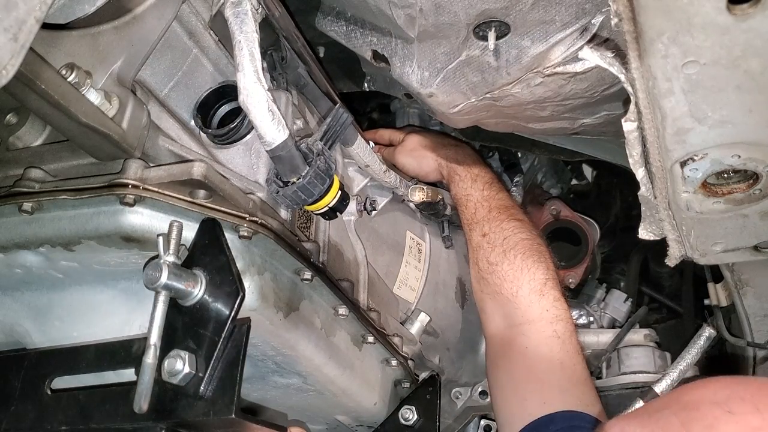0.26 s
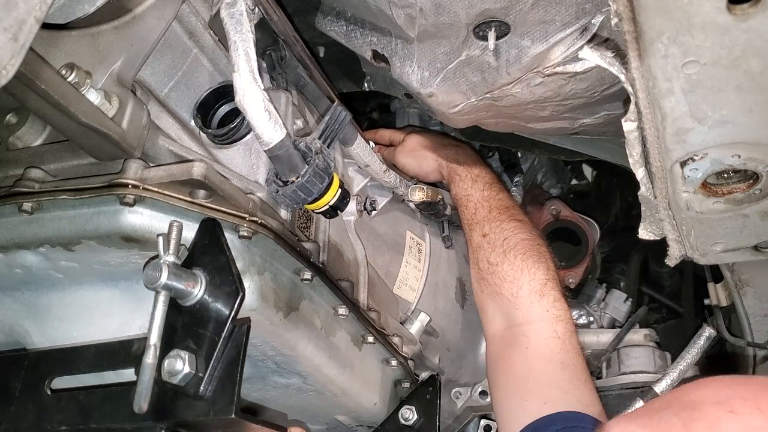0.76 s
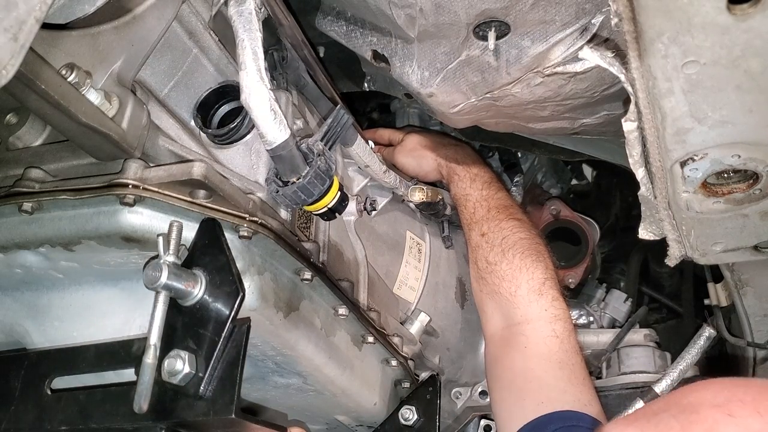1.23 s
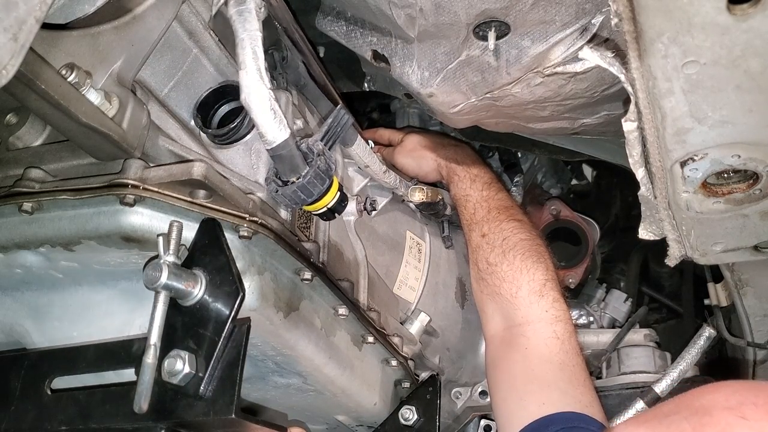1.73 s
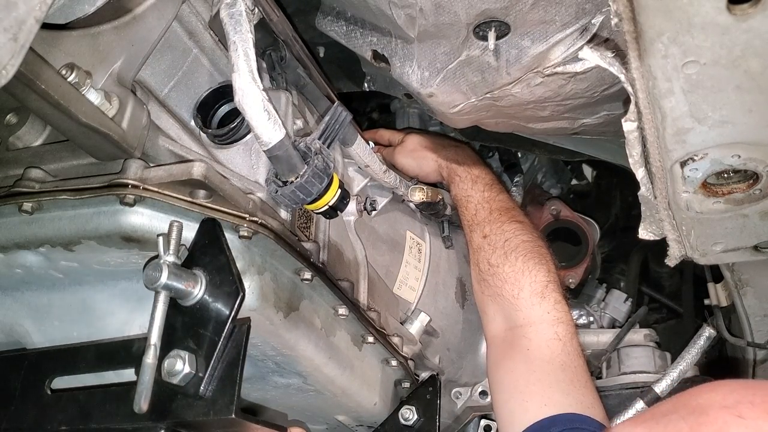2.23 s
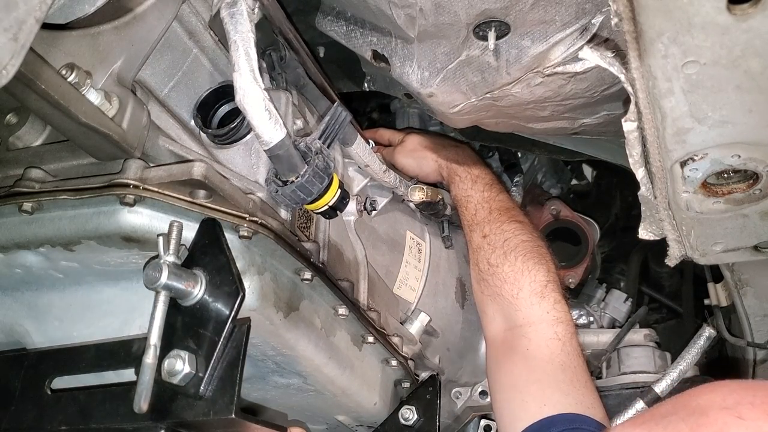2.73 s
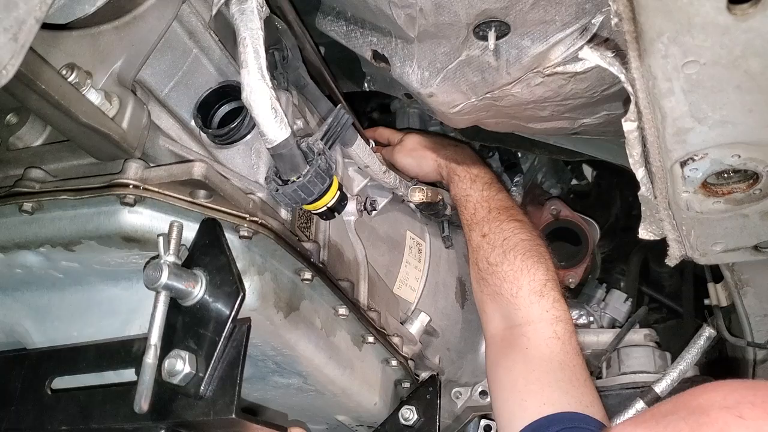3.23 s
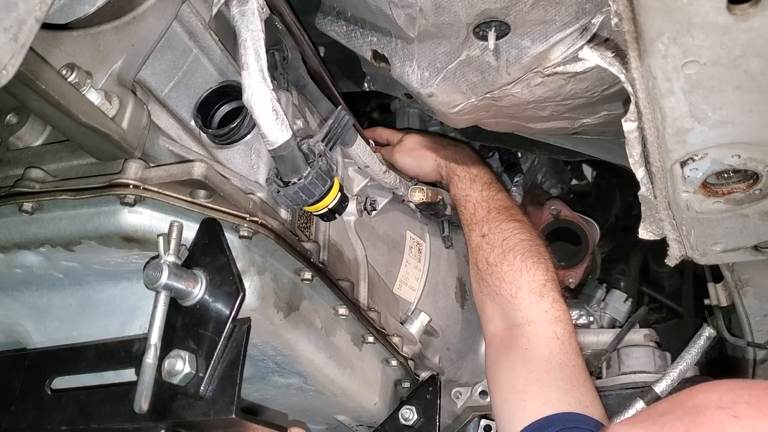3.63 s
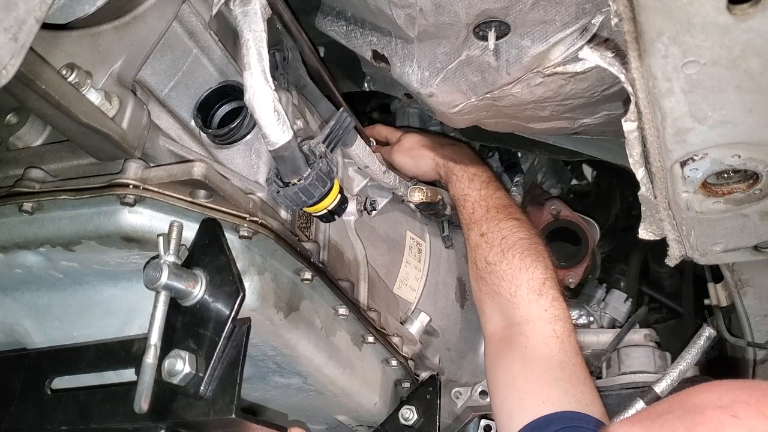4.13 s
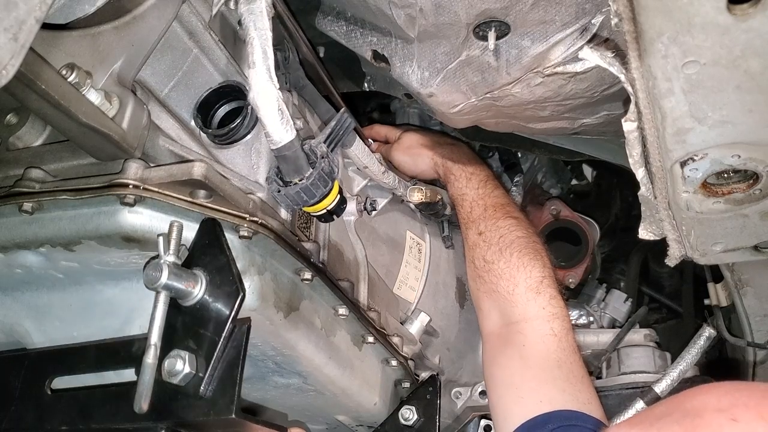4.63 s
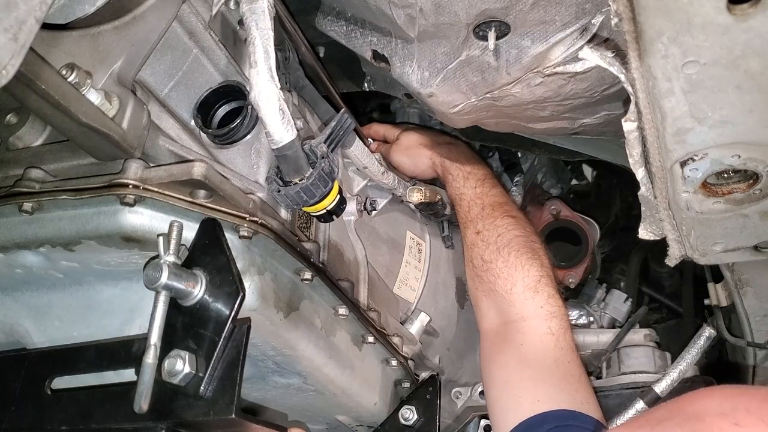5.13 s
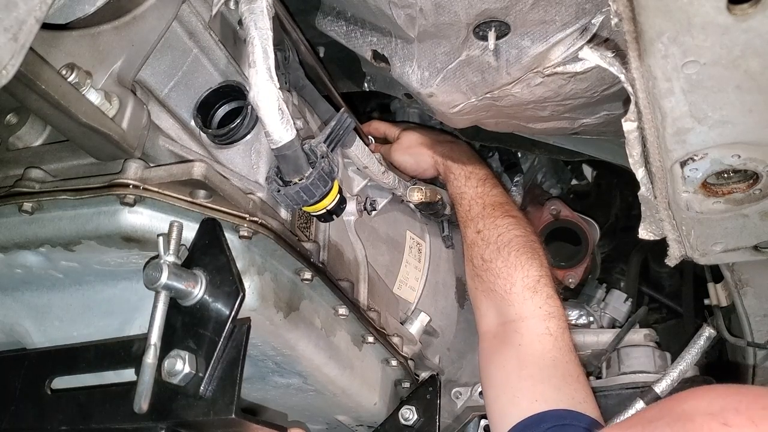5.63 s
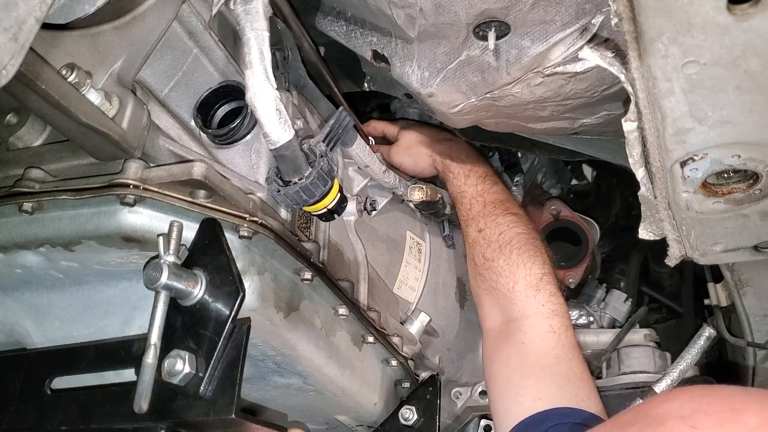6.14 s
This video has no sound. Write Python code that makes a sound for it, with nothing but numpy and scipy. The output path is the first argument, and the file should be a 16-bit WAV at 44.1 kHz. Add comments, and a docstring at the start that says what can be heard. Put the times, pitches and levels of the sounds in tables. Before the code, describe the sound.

A cordless ratchet works on gearbox bolts beneath a car, near the microphone on the left. After one clack over the workshop hum, it rattles through a short, laboured burst and winds down. The tool clicks and knocks as it is reseated, then spins freely to the end with rapid, even chatter, a growing whine and occasional high socket pings, all reflecting tightly off the underbody.

```python
"""A cordless power ratchet backs bolts out of a gearbox under a car on a lift, close up and to the left.
A lone clack sounds over the workshop hum, then a short loaded run labours and coasts to a stop.
Every stroke of the yoke drags the pawl over the teeth, and the underbody throws the clatter back.
The tool clicks and bumps as it is reseated. A long free run follows and lasts to the end,
its gear whine slowly building while the loose socket chimes now and then."""
import sys
import numpy as np
from scipy import signal
from scipy.fft import rfft, irfft, next_fast_len
from scipy.io import wavfile
from scipy.ndimage import uniform_filter1d

SR = 44100
rng = np.random.default_rng(int(sys.argv[2]) if len(sys.argv) > 2 else 0)


def master(y):
    """Save y as 16-bit WAV."""
    cut = np.clip(np.atleast_2d(y).T, -1, 1)
    pcm = np.round(cut * 32767)  # scale
    wavfile.write(sys.argv[1], SR, pcm.astype(np.int16))


N = 280917
TIME = np.arange(N) / SR
RIGHT_LAG = 21  # samples by which the tool reaches the right channel late

# Pulls of the trigger. Each row: press and release in seconds.
TRIGGER_PULLS = [(.91, 1.6), (2.685, 7)]


def undb(db):
    """Decibels to gain."""
    return 10 ** (np.asarray(db) / 20)


def curves(table):
    """One automation curve for each value column of a timed table."""
    seconds, *columns = np.transpose(table)
    return [np.interp(TIME, seconds, column) for column in columns]


def colour(x, hz, db):
    """EQ through a few breakpoints on a log frequency axis."""
    size = next_fast_len(N + 4096)
    bin_hz = np.maximum(np.arange(size // 2 + 1) * SR / size, 1)
    response = undb(np.interp(np.log(bin_hz), np.log(hz), db))
    return irfft(rfft(x, size) * response, size)[..., :N]


def walk(rate_hz):
    """Smooth random wander with a spread near 1."""
    step = int(SR / rate_hz)
    points = rng.standard_normal(N // step + 2)
    return uniform_filter1d(np.interp(np.arange(N) / step, np.arange(len(points)), points), step // 2)


def fade(t, t60):
    """Exponential decay, 60 dB down after t60 seconds."""
    return np.exp(-np.log(1000) * t / t60)


def place(x, right_db):
    """Set a sound on the left: the right channel gets it later and softer."""
    return np.array([x, undb(right_db) * np.roll(x, RIGHT_LAG)])


def rings(rows, rise_s):
    """Rough resonances: bands of noise that build over a short contact and die away."""
    out, t = np.zeros(N + SR), np.arange(SR // 2) / SR
    for start_s, hz, width_hz, db, t60 in rows:
        start = int(start_s * SR)
        band = signal.butter(2, [hz - width_hz / 2, hz + width_hz / 2], "band", fs=SR, output="sos")
        ring = signal.sosfilt(band, rng.standard_normal(SR))[-len(t):]
        ring /= np.sqrt(np.mean(ring ** 2))
        out[start:start + len(t)] += undb(db) * fade(t, t60) * (1 - np.exp(-t / rise_s)) * ring
    return out[:N]


def workshop(air_bed_db=-49):
    """Room tone of machine hum and moving air, centred in the bass and wide above."""
    # Each row: frequency in Hz, relative level of the air in dB.
    air_spectrum = [(20, -34), (38, -20), (55, -8.5), (87, -6), (166, -14.5), (270, -13.5), (350, -21.5),
                    (550, -23.5), (700, -28), (1000, -27.5), (2200, -32), (6600, -40.5), (7600, -49),
                    (16000, -50)]
    # Each row: pitch in Hz, level in dB before the fader.
    hum_tones = [(58, -61), (86, -51), (118.4, -62), (280, -69), (388, -70.5), (571, -72), (818, -76.5)]
    # Each row: time in seconds, hum fader in dB, air fader in dB.
    faders = [(0, 4, -1.5), (.7, 4.5, 1.5), (.92, 8, 5), (1.05, -3, -8), (2.55, -10, -14.5),
              (3, -9.5, -8.5), (6.37, -9, -14)]
    hum_db, air_db = curves(faders)
    hz, db = np.transpose(air_spectrum)
    side_db = np.interp(np.log(hz), np.log([80, 250, 600]), [-17, -5, 0])
    mid = colour(rng.standard_normal(N), hz, db)
    side = colour(rng.standard_normal(N), hz, db + side_db)
    air = np.array([mid + side, mid - side]) / np.std(mid) * undb(air_bed_db + air_db + .95 * walk(13))
    hum = sum(undb(db + 2 * walk(9)) * np.sin(2 * np.pi * hz * TIME + (.3 + hz / 350) * walk(14))
              for hz, db in hum_tones)
    return air + np.sqrt(2) * undb(hum_db) * hum


def windings(hz=8160, lead_s=.008):
    """The motor's windings sing thinly just before it turns."""
    chirps = [(pressed - lead_s, hz, 200, -42.5, .12) for pressed, _ in TRIGGER_PULLS]
    return place(rings(chirps, rise_s=.01), right_db=-8.5)


def bumps():
    """The tool bumps and scuffs the gearbox housing."""
    # Each row: start in seconds, centre in Hz, width in Hz, level in dB, t60 in seconds.
    contacts = [(.859, 4460, 2000, -23, 0.012), (.867, 3670, 1200, -31, 0.026),
                (.966, 863, 252, -30.5, 0.19), (2.275, 225, 90, -48, 0.24),
                (2.308, 3550, 3000, -51.5, 0.045), (2.372, 207, 91, -46, 0.27),
                (2.374, 696, 690, -51, 0.15), (2.401, 1150, 300, -38, 0.062),
                (2.402, 2230, 2110, -43.5, 0.043), (2.765, 172, 70, -44, 0.21),
                (2.84, 161, 68.6, -39, 0.36), (2.85, 910, 400, -32.5, .25)]
    return place(rings(contacts, rise_s=.0014), right_db=-7.5)


def socket_chimes(width_hz=350, t60=.05):
    """The loose socket rings in short, bright pings."""
    # Each row: start in seconds, pitch in Hz, level in dB.
    pings = [(1.0, 9530, -7.5), (1.005, 8410, -13), (1.147, 9650, -10), (1.751, 9760, -17),
             (3.023, 9900, -14), (4.008, 9600, -9), (4.553, 9830, -12), (5.158, 9770, -7.5),
             (5.855, 9700, -10)]
    chimes = rings([(start_s, hz, width_hz, db, t60) for start_s, hz, db in pings], rise_s=.00033)
    return place(chimes, right_db=-8.5)


def motor(spin_up_s=.045, coast_s=.36, friction=.15):
    """Spin 0-1 and seconds since the trigger pull: the motor runs up fast and coasts against friction."""
    spin, age = np.zeros(N), np.zeros(N)
    for pressed, released in TRIGGER_PULLS:
        rise = 1 - np.exp(-np.maximum(TIME - pressed, 0) / spin_up_s)
        coast = (1 + friction) * np.exp(-np.maximum(TIME - released, 0) / coast_s) - friction
        spin += rise * np.maximum(coast, 0)
        age = np.where(TIME >= pressed, TIME - pressed, age)
    return spin, age


def effort(spin, load, slack_s=.0087, waver_db=1):
    """Gains of the clatter's ring and low body: both follow the spin once the slack is taken up."""
    # Each row: time in seconds, level of the ring at full spin in dB.
    fader = [(1.05, -16.5), (1.38, -19), (1.5, -17.5), (1.75, -20.5), (2.7, -24.5), (2.85, -17.5),
             (3.08, -20.5), (4.3, -20), (5.4, -20.5), (6.25, -19)]
    engaged = np.interp(TIME - slack_s, TIME, spin)
    level = undb(curves(fader)[0] + waver_db * walk(13))
    body_db = -24.5 + 3 * load
    return level * engaged ** 1.52, level * engaged ** .91 * undb(body_db)


def drive(turns, age, load, gain, gear_teeth=42, build_s=2.7):
    """The yoke shakes, harder under load, and the gears' wavering whine comes in as a run goes on."""
    # Each row: multiple of the stroke rate, free and loaded level in dB relative to the clatter.
    harmonics = [(1, -51.5, -45), (2, -54.5, -35.5), (3, -43, -34.5), (4, -45, -38.5), (5, -50, -43)]
    shake = np.zeros(N)
    for multiple, free_db, loaded_db in harmonics:
        level = undb(free_db + load * (loaded_db - free_db) + 3.9 * walk(11))
        shake += level * np.sin(2 * np.pi * multiple * turns + .37 * walk(15))
    whine_db = np.interp(age, [0, build_s], [-36, -18.5]) + 3.3 * walk(30)
    whine = undb(whine_db) * np.sin(2 * np.pi * gear_teeth * turns + 1.8 * walk(110) + 3 * walk(8))
    return np.sqrt(2) * gain * (place(shake, right_db=-8) + place(whine, right_db=-5))


def panels(x, sway_s=.00005):
    """Early reflections off nearby panels comb the sound; the comb shifts as the hand sways."""
    # Each row: delay in seconds, level in dB.
    taps = [(.0019, -27.5), (.0043, -21), (.0071, -23.5)]
    mirrored = [sum(undb(db) * np.interp(TIME - delay - sway_s * walk(3), TIME, channel)
                    for delay, db in taps) for channel in x]
    return x + np.array(mirrored)


def grip(x, depth_db=1.8, rate_hz=6):
    """Bands half an octave apart swell and fade on their own as the hand shifts."""
    out = x
    for hz in 1900 * np.sqrt(2) ** np.arange(6):
        band = signal.lfilter(*signal.iirpeak(hz, Q=7, fs=SR), x)
        out = out + band * (undb(depth_db * walk(rate_hz)) - 1)
    return out


def head(x, load):
    """The steel head colours the blows; under load the housing rings along through the tight bolt."""
    # The head's EQ, free and loaded. Each row: frequency in Hz, left gain in dB, right gain in dB.
    free_eq = [(170, -46, -38), (355, -38, -43.5), (523, -25, -32.5), (1566, -21.5, -24),
               (1830, -11.5, -18), (3030, -3, -7.5), (3890, -7, -13), (6580, -2.5, -14.5),
               (8060, -10, -12.5), (8900, -2.5, -3.5), (10000, -4.5, -10.5), (13640, 4, -10.5),
               (13900, 9, -7), (14060, -2.5, -12)]
    loaded_eq = [(152.4, -39.5, -36.5), (354, -32, -48.5), (514, -26, -32), (1566, -21.5, -26),
                 (2140, -10.5, -17), (2740, -2.5, -13.5), (4700, -2, -13), (5730, -8, -19), (6660, -4, -20),
                 (7650, -12, -23), (8800, -9, -13.5), (10200, -10, -20), (13100, 2, -15), (15700, 1, -15)]
    # Each row: centre in Hz, width in Hz, gain in dB.
    housing_modes = [(550, 38, 1.5), (2750, 510, -2), (4250, 650, -13.5)]
    free, loaded = (np.array([colour(x[0], hz, left_db), colour(x[1], hz, right_db)])
                    for hz, left_db, right_db in (np.transpose(free_eq), np.transpose(loaded_eq)))
    housing = sum(undb(db) * signal.lfilter(*signal.iirpeak(hz, hz / width, fs=SR), loaded)
                  for hz, width, db in housing_modes)
    return (1 - load) * free + load * (loaded + housing)


def strike(times, sizes, ring_s, rise_s, echo_db, echo_s):
    """Each blow cracks, rings the steel in its own mix and scatters off the underbody."""
    # Modes of head and socket. Each row: pitch in Hz, t60 in seconds, gain in dB.
    steel_modes = [(1942, 0.059, -25), (2250, 0.025, -38.5), (2810, 0.02, -29), (3970, 0.01, -36),
                   (6100, .012, -15), (8470, 0.023, -33.5), (9640, 0.022, -12.5), (13470, 0.016, -19.5)]
    starts = (times * SR).astype(int)
    t = np.arange(SR // 3) / SR
    crack_t = t[:SR // 60]
    crack = fade(crack_t, ring_s) * (1 - np.exp(-crack_t / rise_s))
    echo = fade(t, echo_s) * (1 - np.exp(-t / .001))
    # overlapping cracks and their diffuse echoes add in energy
    power = signal.oaconvolve(np.bincount(starts, sizes ** 2, N)[:N], crack ** 2)[:N]
    power += undb(2 * echo_db) * signal.oaconvolve(power, echo ** 2 / np.sum(echo ** 2))[:N]
    near, far = np.sqrt(np.abs(power)) * rng.standard_normal((2, N))
    for hz, t60, db in steel_modes:
        blows = np.bincount(starts, sizes * rng.standard_normal(len(starts)), N)[:N]
        radius, angle = fade(1 / SR, t60), 2 * np.pi * hz / SR
        feedback = [1, -2 * radius * np.cos(angle), radius ** 2]
        near = near + undb(db) * signal.lfilter([0, radius * np.sin(angle)], feedback, blows)
    # long waves reach both sides alike, short ones by different paths
    blend_hz = [700, 1500, 8000]
    right = colour(near, blend_hz, [-.8, -7, -11]) + colour(far, blend_hz, [-8, -1, -.4])
    return np.array([near, np.roll(right, RIGHT_LAG)])


def clacks(load):
    """Single hard blows as the pawl catches or the socket shifts on the bolt."""
    # Each row: start in seconds, strength of the blow in dB.
    hits = [(0.4959, -15.5), (0.8595, -38), (0.932, -1), (0.9497, -4), (0.965, -4), (1.006, -4),
            (1.101, -7), (1.1374, -5), (1.1782, -5), (1.455, -4), (1.568, -2.5), (1.59, -5), (1.7412, -5.5),
            (1.751, -7), (1.7928, -17), (1.8702, -9), (2.0539, -11), (2.094, -26), (2.098, -15.5),
            (2.171, -13), (2.2049, -13.5), (2.2468, -36), (2.4003, -48), (2.6408, -41), (2.728, -8.5),
            (4.8189, -4), (5.0704, -4.5)]
    times, db = np.transpose(hits)
    blows = strike(times, undb(db), ring_s=.019, rise_s=.00018, echo_db=-17.5, echo_s=.21)
    return colour(head(blows, np.clip(load, 0, .3)), [500, 1200, 2500, 14000], [-.5, 8.5, -2, -.5])


def pawl(turns, stroke_hz, load, slop=.016, scatter_db=2.1):
    """Times and sizes of the pawl's blows: one pattern every stroke, a little loose in time and force."""
    # Each row: place in the stroke from 0 to 1, free strength in dB, loaded strength in dB.
    pattern = [(.1, 1.5, -4), (.29, 3, -5), (.37, -2.5, -5.5), (.52, 1.5, -8.5), (.6, 3.5, -6),
               (0.902, -9.5, -4.5)]
    where, free_db, loaded_db = np.transpose(pattern)
    strokes = np.arange(int(turns[-1]))[:, None]
    chance = np.clip(rng.standard_normal((len(strokes), 2, len(where))), -2, 1.4)
    times = np.interp(strokes + where + slop * chance[:, 0], turns, TIME)
    db = free_db + np.interp(times, TIME, load) * (loaded_db - free_db) + scatter_db * chance[:, 1]
    # below 36 strokes a second the pawl drops more softly
    return times, undb(db) * np.minimum(np.interp(times, TIME, stroke_hz) / 36, 1)


def clatter(turns, stroke_hz, load, ring_gain, body_gain, rattle_db=-14, rasp_db=-20):
    """The pawl hammers over the teeth; the socket rattles and the gears rasp in between."""
    times, sizes = pawl(turns, stroke_hz, load)
    rattle_at, softness = rng.random((2200, 2)).T
    times = np.append(times, rattle_at * TIME[-1])
    sizes = np.append(sizes, undb(rattle_db - 36 * softness))
    blows = strike(times, sizes, ring_s=.022, rise_s=.00078, echo_db=-6, echo_s=.22)
    rasp = undb(rasp_db) * place(rng.standard_normal(N), right_db=-10.5)
    metal = grip(head(panels(blows + rasp), load))
    low = signal.sosfiltfilt(signal.butter(4, 1600, fs=SR, output="sos"), metal)
    # level the bright ring and the low body, then let each swell with the effort of the drive
    ring, body = (band / np.sqrt(uniform_filter1d(band.mean(0) ** 2, SR // 8) + 1e-9)
                  for band in (metal - low, low))
    return ring_gain * ring + body_gain * body


def scene(free_stroke_hz=54.83):
    """The ratchet and its small knocks over the workshop's room tone."""
    # How hard the bolt resists. Each row: time in seconds, load from 0 to 1.
    resistance = [(0.93, 0.96), (1.6, 0.77), (2.2, 0.24), (2.88, 0.23), (3.1, 0), (3.9, 0.02), (6.37, 0.26)]
    # Tight thread slows the yoke. Each row: time in seconds, stroke rate lost at full spin in Hz.
    thread_drag = [(.93, 0), (1.08, 17), (1.32, 17), (1.42, 4), (1.6, 5), (2.7, 0)]
    spin, age = motor()
    stroke_hz = spin * (free_stroke_hz - curves(thread_drag)[0])
    turns = np.cumsum(stroke_hz) / SR  # one turn is one stroke of the yoke
    load = curves(resistance)[0]
    ring_gain, body_gain = effort(spin, load)
    tool = clatter(turns, stroke_hz, load, ring_gain, body_gain) + clacks(load)
    tool += drive(turns, age, load, ring_gain)
    return workshop() + windings() + bumps() + socket_chimes() + tool


def record(dry, top_hz=15800):
    """Peaks clip at full scale, then a steep low-pass cuts the top."""
    lowpass = signal.ellip(12, .1, 85, top_hz, fs=SR, output="sos")
    return signal.sosfilt(lowpass, np.clip(dry, -1, 1))


dry = scene()
out = record(dry)
master(out)
```